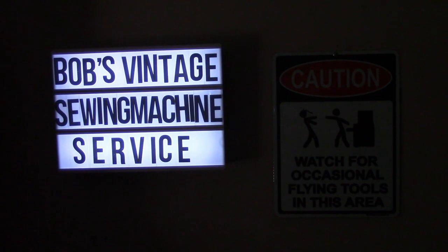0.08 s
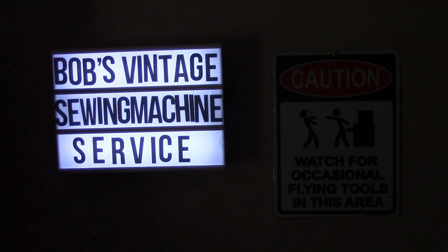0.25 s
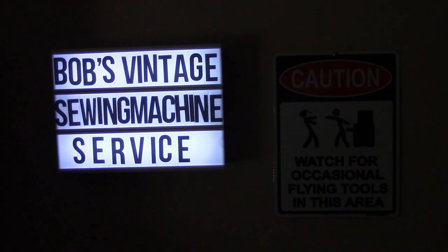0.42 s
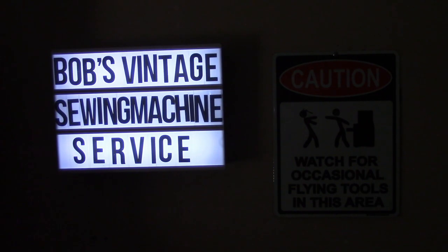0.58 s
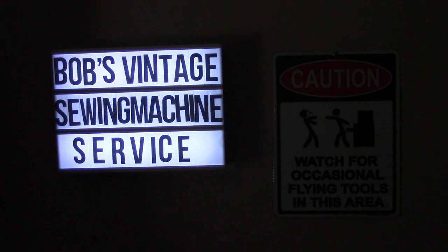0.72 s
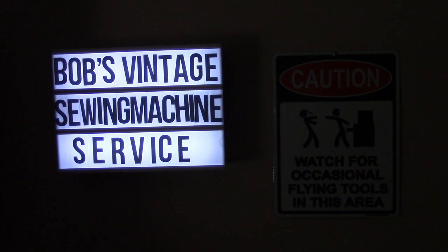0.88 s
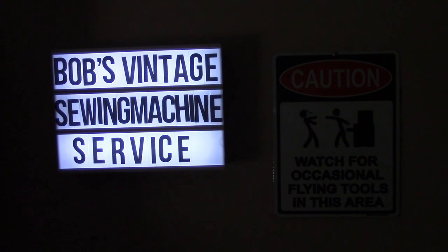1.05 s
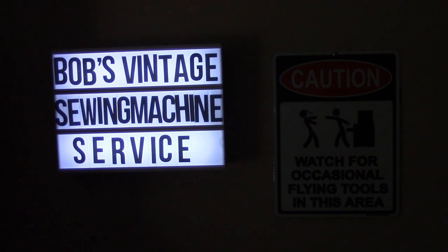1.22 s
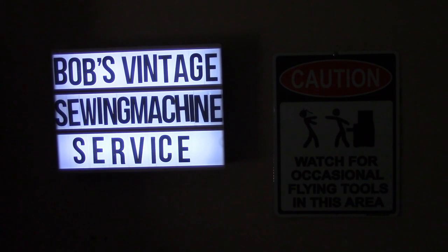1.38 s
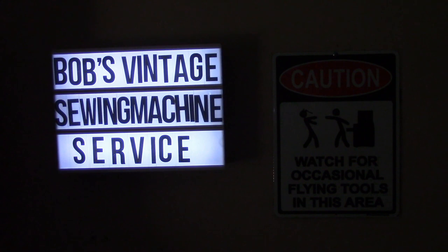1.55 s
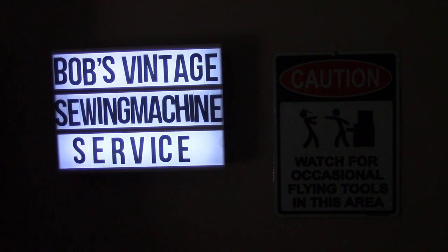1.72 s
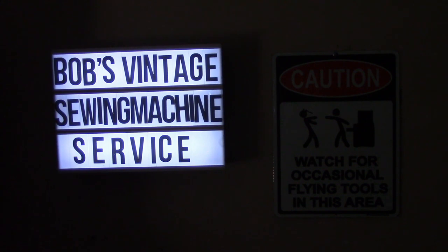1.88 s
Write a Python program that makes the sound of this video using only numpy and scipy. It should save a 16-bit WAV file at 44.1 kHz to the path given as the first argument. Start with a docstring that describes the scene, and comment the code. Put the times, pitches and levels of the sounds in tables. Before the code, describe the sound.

Loud multi-hit slam of a heavy door, rattling in its frame, with bassy wall boom and echo fading into a low hum, a tiny high tick, then a dry close wood knock over faint room hiss.

```python
"""A heavy door slams in a live neighbouring space, rattles and booms on; later, wood is knocked close by.
The door's contacts are short cracks plus panel tones, its rattle is random hits, its boom is decaying wall tones.
A low hum swells up in the boom, and one brief high tick follows. The near knocks are a thump, a click and wood tones.
Door, knocks and tick fed through tails of fading noise give the hall and the quiet room; room tone and hiss
lie under everything."""
import sys
import numpy as np
from scipy import signal
from scipy.fft import rfft, irfft, next_fast_len
from scipy.io import wavfile

SR = 44100
rng = np.random.default_rng(int(sys.argv[2]) if len(sys.argv) > 2 else 0)


def volts(x):
    """Linear amplitude factor 10**(x/20) for a level x in dB, scalar or array-like."""
    e = np.asarray(x, float) / 20
    return 10 ** e


def wrap_up_sound(samples):
    """Save the sound to the file named by the first command line argument, as 16-bit audio."""
    columns = np.atleast_2d(samples).T
    # keep every value between -1 and 1, then stretch to whole-number steps
    tamed = np.clip(columns, -1, 1)
    steps = np.round(tamed * 32767).astype(np.int16)
    wavfile.write(sys.argv[1], SR, steps)


N = 85995  # length in samples

# In all tables, t60 is the time a sound takes to fall by 60 dB.
# Steady room tone and hiss. Each row: frequency in Hz, relative level in dB per Hz.
FLOOR_COLOUR = [(12, -40), (20, 0), (119, -12), (186, -4), (452, -5.5), (535, -8.5), (959, -11),
                (1720, -13), (2150, -17), (5240, -22.5), (15500, -35)]
FLOOR_DB = -60.5
# An earlier bump dying away. Each row: frequency in Hz, relative level in dB per Hz.
BUMP_COLOUR = [(59, -29), (100, -21), (210, -4), (683, -16.5), (989, -15.5), (3000, -25), (3900, -30),
               (6600, -120)]
BUMP_DB, BUMP_T60_S = -55, 0.5
# How alike left and right are in the floor. Each row: frequency in Hz, likeness from 0 to 1.
FLOOR_ALIKE = [(60, 0.67), (240, 0.51), (950, 0.55), (3770, 0.65), (15000, 0.74)]

# Low stir of the moving leaf. Each row: time in seconds, level in dB.
SWING = [(0.0, -57.5), (0.09, -59), (0.122, -63), (0.202, -58), (0.22, -48)]
# Colour of that stir. Each row: frequency in Hz, relative level in dB per Hz.
SWING_COLOUR = [(12, -18), (22, -2), (50, 8), (90, -40), (200, -90)]
# Air squeezed by the closing leaf: centre time, level, width and pitch.
PUSH_S, PUSH_DB, PUSH_WIDTH_S, PUSH_HZ = 0.243, -23, 0.0058, 30
# Heavy thuds of the leaf into the walls. Each row: start in seconds, level in dB, favoured pitch in Hz.
THUDS = [(0.249, -20, 27.6), (0.266, -26, 60), (0.314, -14.5, 36), (.35, -17, 42), (0.411, -15, 50.5),
         (0.453, -19.5, 56), (0.542, -30, 75)]
THUD_FALL_DB = 6.5  # per octave away from the favoured pitch
# Wall and room tones. Each row: pitch in Hz, relative level in dB, t60 in seconds, rise in seconds.
WALLS = [(20.2, -6, 1.27, 0.012), (27.53, -1.5, 0.67, 0.015), (42, -16.5, 1.67, 0.026),
         (38, 9.5, 0.32, 0.035), (56, 5, .4, 0.03), (67.1, 1.5, .35, 0.014), (78.8, -4, 0.44, 0.011),
         (85, -20, 0.3, 0.013)]
LOW_SIDE_DB = -25.5  # left-right difference part of boom and hum, against their middle

# Door contacts. Each row: start in seconds, crack level in dB, crack pitch in Hz, panel level in dB.
SLAMS = [(.2478, -11.5, 1970, -28), (0.2514, -5.5, 1860, -26.5), (0.2649, -13, 2520, -28),
         (0.3101, -7, 3200, -29.5), (.345, -39.5, 1500, -26), (0.4503, -11, 760, -32.5)]
# Colour of the crack noise. Each row: multiple of the crack pitch, relative level in dB per Hz.
CRACK_COLOUR = [(.1, -15), (.3, 6.5), (.7, 9), (1.2, -2.5), (2, -8), (3.5, -25), (6, -32), (20, -100)]
CRACK_T60_S, CRACK_RISE_S = 0.008, 0.0006
CRACK_NOISE_DB, CRACK_NOISE_T60_S = -9, 0.035  # noise level is added to each crack level
# Door panel tones. Each row: pitch in Hz, relative level in dB, t60 in seconds.
PANEL = [(134.6, -1.5, 0.32), (172.5, -11, 0.18), (203, -3, 0.26), (287.7, -2.5, 0.203), (360.6, -15, 0.59),
         (473, -10.5, 0.41), (571, -3.5, 0.32), (606, -6, 0.09), (670, -31, 0.089), (903, -8.5, 0.16),
         (1025, -14, 0.15)]
# Leaf rattling in its frame. Each row: time in seconds, body level in dB, treble level in dB.
SHUDDER = [(.247, -27, -35.5), (0.254, -28.5, -54), (0.27, -21.5, -35), (0.302, -30.5, -47),
           (.309, -19.5, -34.5), (0.329, -24.5, -59), (0.441, -29, -52), (.47, -34.5, -76),
           (0.559, -41, -82)]
# Body of the rattle. Each row: frequency in Hz, relative level in dB per Hz.
RATTLE_COLOUR = [(53, -22), (90, -4), (136, -5), (270, -11.5), (424, -11), (463, -6), (515, -8.5),
                 (1450, -16.5), (7780, -45), (15500, -82)]
# Treble of the rattle. Each row: frequency in Hz, relative level in dB per Hz.
TREBLE_COLOUR = [(1500, -45), (3000, 1.5), (4500, 2), (8000, -6.5), (12500, -15), (15500, -30)]
RATTLES_PER_S, RATTLE_SPREAD_DB = 2500, 4
# How alike left and right are in cracks and rattle. Each row: frequency in Hz, likeness from 0 to 1.
DIRECT_ALIKE = [(100, 0.96), (300, 0.9), (600, 0.68), (2000, 0.55), (10000, 0.49)]
# Where the door sits. Each row: frequency in Hz, how much louder the right is in dB.
DOOR_PAN = [(200, 0), (600, -0.4), (1500, 5), (4000, 2), (10000, -0.5)]

# Late low hum after the slam. Each row: pitch in Hz, level in dB, t60 in seconds.
HUM = [(76.3, -26.5, 1.34), (151, -41.5, 1.46)]
HUM_S, HUM_RISE_S = 0.45, 0.2

# One brief high ring: start, level, pitch, t60, rise, and the level it is sent into the room at.
TICK_S, TICK_DB, TICK_HZ = 0.7168, -28, 4150
TICK_T60_S, TICK_RISE_S, TICK_WET_DB = 0.009, 0.001, -10

# Near knocks. Each row: start in seconds, thump level in dB, click level in dB, ring level in dB.
KNOCKS = [(1.6271, -1.5, -28, -36.5), (1.6337, -40, -23.5, -37), (1.7987, -34, -64, -51.5)]
# Colour of the click. Each row: frequency in Hz, relative level in dB per Hz.
CLICK_COLOUR = [(240, -3), (400, -5), (2790, -11.5), (3360, -14), (4630, -27), (9210, -35.5),
                (12100, -40.5), (15500, -93)]
# Tones of the wood. Each row: pitch in Hz, relative level in dB, t60 in seconds.
WOOD = [(123.3, -7.5, 0.18), (171.4, 2.5, 0.15), (252, -1, 0.12), (301, -7.5, 0.14), (357.2, 6, 0.098),
        (474, -2.5, 0.29), (596, -10, 0.25), (1055, -17, 0.21), (2200, -12, .08), (3500, -26, .08)]
THUMP_S, CLICK_T60_S, CLICK_RISE_S, KNOCK_LOW_HZ = 0.00056, 0.045, 0.00045, 90
NEAR_PAN_DB = 0.7  # how much louder the direct knocks and tick are on the right

# Echo of the space around the door. Each row: frequency in Hz, t60 in seconds.
HALL = [(100, 0.72), (400, 0.83), (1500, 1.0), (4000, 1.0), (8000, 0.8), (14000, 0.16)]
# Echo of the quiet near room. Each row: frequency in Hz, t60 in seconds.
ROOM = [(100, 0.17), (420, 0.41), (1100, 0.26), (3000, 0.13), (8000, 0.27)]
HALL_DB, ROOM_DB = -7, -4
# How alike left and right are in both echoes. Each row: frequency in Hz, likeness from 0 to 1.
ECHO_ALIKE = [(60, 1), (200, 0.97), (500, 0.71), (2000, .4), (10000, 0.17)]
TOP_HZ = 15700  # nothing in the mix passes above this


def unit(x):
    """Scales x to an rms of 1."""
    return x / np.sqrt(np.mean(x ** 2) + 1e-20)


def along(points, hz):
    """Reads between (Hz, value) points on a logarithmic frequency axis."""
    f, v = np.transpose(points)
    return np.interp(np.log(hz + 1), np.log(f + 1), v)


def filtered(x, response):
    """Multiplies the spectrum of x by a function of frequency."""
    n = x.shape[-1]
    m = next_fast_len(n + 8192)  # spare room for the filter's own ringing
    return irfft(rfft(x, m) * response(np.fft.rfftfreq(m, 1 / SR)), m)[..., :n]


def noise(colour, size):
    """Random noise with the given colour and an rms of 1."""
    white = rng.standard_normal(size)
    return unit(filtered(white, lambda hz: volts(along(colour, hz))))


def widened(pair, alike):
    """Mixes two unrelated signals into a left and right as alike as the table says."""
    def mid_side_gains(hz):
        turn = np.arccos(np.clip(along(alike, hz), -1, 1)) / 2
        return np.array([np.cos(turn), np.sin(turn)])

    mid, side = filtered(pair, mid_side_gains)
    return np.array([mid + side, mid - side])


def since(s):
    """Seconds passed after time s, zero before it."""
    return np.maximum(np.arange(N) / SR - s, 0)


def dying(s, t60):
    """Envelope that starts at s and falls 60 dB in every t60 seconds."""
    return (since(s) > 0) * volts(-60 * since(s) / t60)


def rising(s, rise):
    """Envelope that climbs smoothly from 0 at s towards 1."""
    return 1 - np.exp(-since(s) / rise)


def tone(s, hz):
    """Sine wave that starts at time s."""
    return np.sin(2 * np.pi * hz * since(s))


def ring(s, modes, spread_db):
    """Decaying tones, each randomly a little stronger or weaker."""
    out = np.zeros(N)
    for hz, db, t60 in modes:
        level = volts(db + spread_db * rng.normal())
        out += level * dying(s, t60) * tone(s, hz)
    return out


def space(x, t60s):
    """Diffuse stereo echo: each third of a second of x gets a fresh tail of fading noise."""
    out, step = np.zeros((2, N + 2 * SR)), SR // 3
    delay = 200  # samples before the echo starts
    for k in range(0, N, step):
        hz, t, z = signal.stft(rng.standard_normal((2, SR + SR // 2)), SR, nperseg=256)
        fade = volts(-60 * t / along(t60s, hz)[:, None])
        tail = signal.istft(z * fade, SR, nperseg=256)[1]
        tail = widened(tail, ECHO_ALIKE)
        wet = signal.fftconvolve(x[None, k:k + step], tail / np.linalg.norm(tail[0]), axes=1)
        out[:, k + delay:k + delay + wet.shape[1]] += wet
    return out[:, :N]


def floor():
    """Steady coloured noise for room tone and hiss, plus decaying noise for an earlier bump."""
    bump = volts(BUMP_DB) * dying(0, BUMP_T60_S) * noise(BUMP_COLOUR, size=(2, N))
    steady = volts(FLOOR_DB) * noise(FLOOR_COLOUR, size=(2, N))
    return widened(steady + bump, FLOOR_ALIKE)


def boom():
    """The leaf stirs and pushes the air, then each thud sets the walls ringing, most near its favoured pitch."""
    t = np.arange(N) / SR
    s, db = np.transpose(SWING)
    before_slam = t < SLAMS[0][0]
    stir = volts(np.interp(t, s, db)) * before_slam * noise(SWING_COLOUR, size=N)
    pulse = np.exp(-((t - PUSH_S) / PUSH_WIDTH_S) ** 2)
    push = -volts(PUSH_DB) * pulse * np.cos(2 * np.pi * PUSH_HZ * (t - PUSH_S))
    out = stir + push
    for s, thud_db, favoured_hz in THUDS:
        for hz, db, t60, rise in WALLS:
            octaves_away = abs(np.log2(hz / favoured_hz))
            level = volts(thud_db + db - THUD_FALL_DB * octaves_away)
            out += level * dying(s, t60) * rising(s, rise) * tone(s, hz)
    return out


def contacts():
    """Each contact gives a short pitched crack with noise around it, and rings the door panel."""
    tones, cracks = np.zeros(N), np.zeros((2, N))
    for s, crack_db, hz, panel_db in SLAMS:
        rise = volts(crack_db) * rising(s, CRACK_RISE_S)
        tones += rise * dying(s, CRACK_T60_S) * tone(s, hz)
        tones += volts(panel_db) * ring(s, PANEL, spread_db=3.5)
        colour = [(multiple * hz, db) for multiple, db in CRACK_COLOUR]
        hiss = dying(s, CRACK_NOISE_T60_S) * noise(colour, size=(2, N))
        cracks += rise * volts(CRACK_NOISE_DB) * hiss
    return tones + widened(cracks, DIRECT_ALIKE)


def shudder():
    """The leaf rattles all over its frame: random hits of uneven strength, with treble noise on top."""
    chance = rng.random((2, N))
    sign = np.sign(rng.standard_normal((2, N)))
    strength = volts(RATTLE_SPREAD_DB * rng.standard_normal((2, N)))
    hits = (chance < RATTLES_PER_S / SR) * sign * strength
    s, body_db, treble_db = np.transpose(SHUDDER)
    t = np.arange(N) / SR
    body = volts(np.interp(t, s, body_db, -120, -120))
    treble = volts(np.interp(t, s, treble_db, -120, -120))
    coloured_hits = unit(filtered(hits, lambda hz: volts(along(RATTLE_COLOUR, hz))))
    rattle = body * coloured_hits + treble * noise(TREBLE_COLOUR, size=(2, N))
    return widened(rattle, DIRECT_ALIKE)


def hum():
    """Two low tones that swell slowly and outlast the boom."""
    return ring(HUM_S, HUM, spread_db=1.0) * rising(HUM_S, HUM_RISE_S)


def tick():
    """One high tone that rises and dies within milliseconds."""
    envelope = dying(TICK_S, TICK_T60_S) * rising(TICK_S, TICK_RISE_S)
    return volts(TICK_DB) * envelope * tone(TICK_S, TICK_HZ)


def knocks():
    """A dip-and-push thump, a noisy click and the ring of the wood; too small to give deep bass."""
    out = np.zeros(N)
    for s, thump_db, click_db, ring_db in KNOCKS:
        u = since(s) / THUMP_S
        thump = u * (u - 1) * np.exp(-u)
        click = dying(s, CLICK_T60_S) * rising(s, CLICK_RISE_S) * noise(CLICK_COLOUR, size=N)
        out += volts(thump_db) * thump + volts(click_db) * click
        out += volts(ring_db) * ring(s, WOOD, spread_db=5)
    return filtered(out, lambda hz: (1j * hz / (KNOCK_LOW_HZ + 1j * hz)) ** 2)  # weakens the bass


def scene():
    """Puts door and boom far and knocks near; the boom reaches both sides almost alike."""
    door = contacts() + shudder()
    knock, high_tick = knocks(), tick()
    low = boom() + hum()

    door = door + volts(HALL_DB) * space(door.mean(axis=0), HALL)
    door = filtered(door, lambda hz: volts(np.outer([-0.5, 0.5], along(DOOR_PAN, hz))))

    close = (knock + high_tick) * volts(NEAR_PAN_DB * np.array([[-0.5], [0.5]]))
    close = close + volts(ROOM_DB) * space(knock + volts(TICK_WET_DB) * high_tick, ROOM)

    # a quarter-cycle shift makes the small difference between left and right
    low_side = volts(LOW_SIDE_DB) * filtered(low, lambda hz: 1j + 0 * hz)
    return door + low + low_side * [[1], [-1]] + close + floor()


def band_limit(x):
    """A steep low-pass at the top of the band."""
    return signal.sosfilt(signal.butter(12, 15680, fs=SR, output="sos"), x)


def record(dry):
    """Cuts off everything from TOP_HZ upwards to finish the mix."""
    mix = filtered(dry, lambda hz: hz < TOP_HZ)
    return band_limit(mix)


dry = scene()
out = record(dry)
wrap_up_sound(out)
```